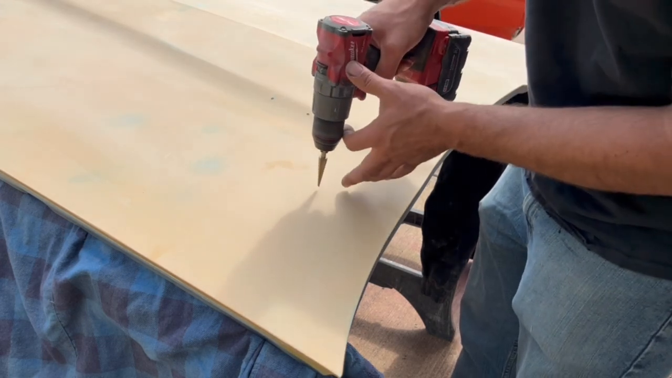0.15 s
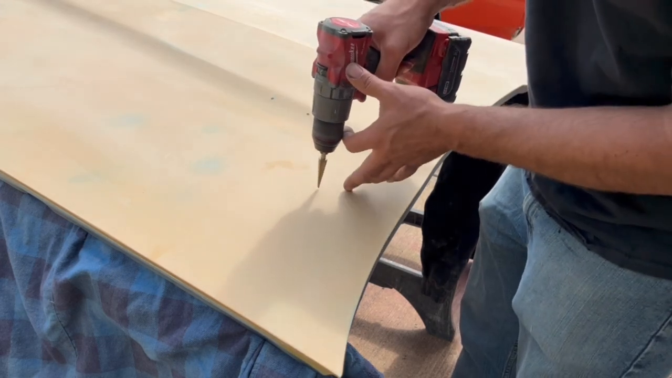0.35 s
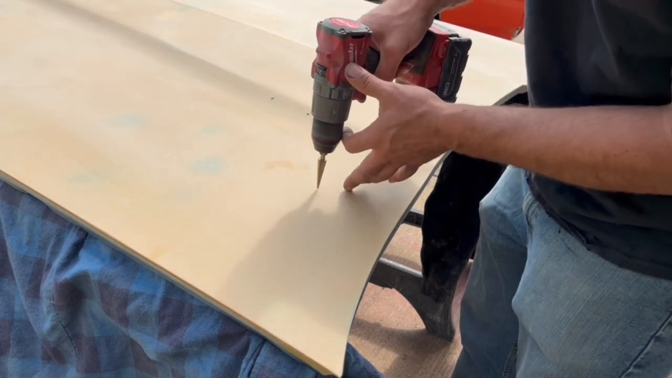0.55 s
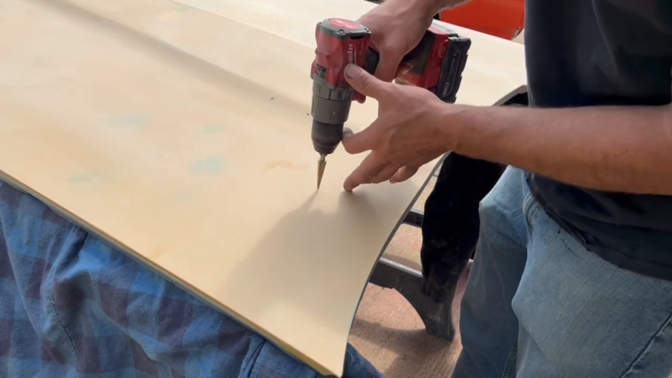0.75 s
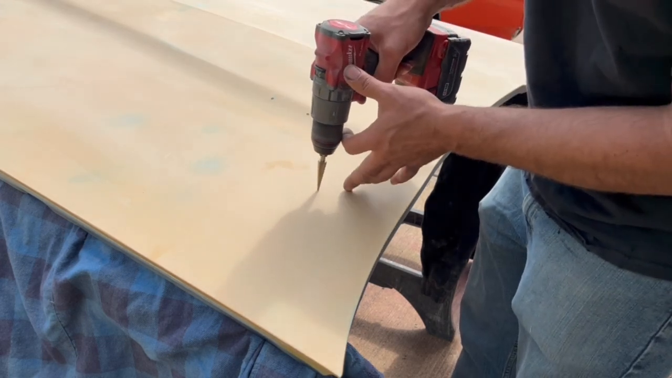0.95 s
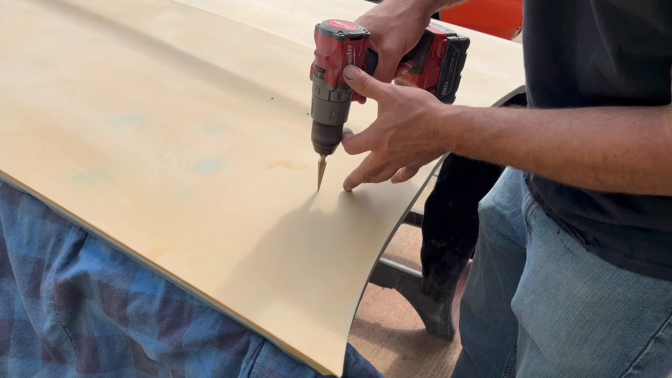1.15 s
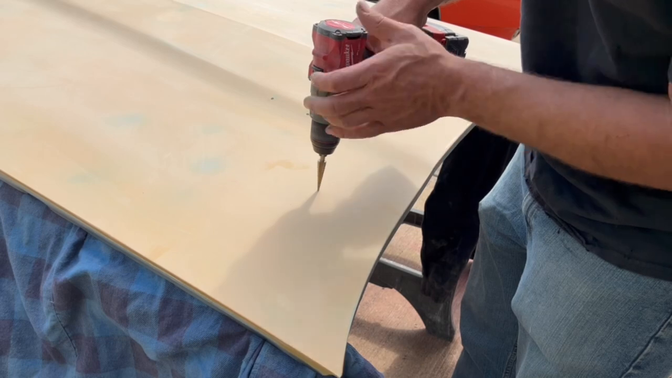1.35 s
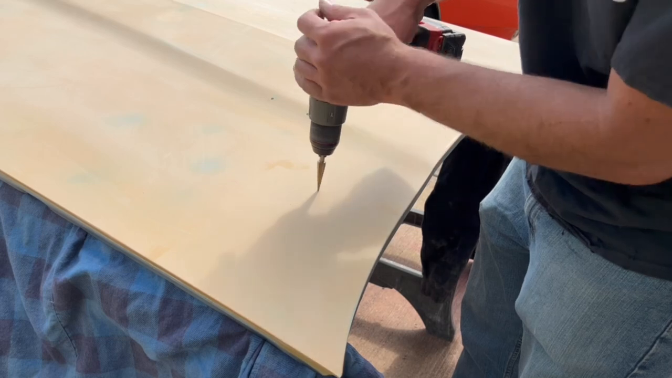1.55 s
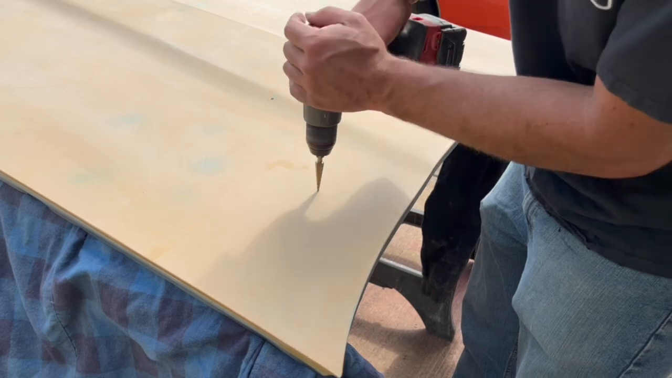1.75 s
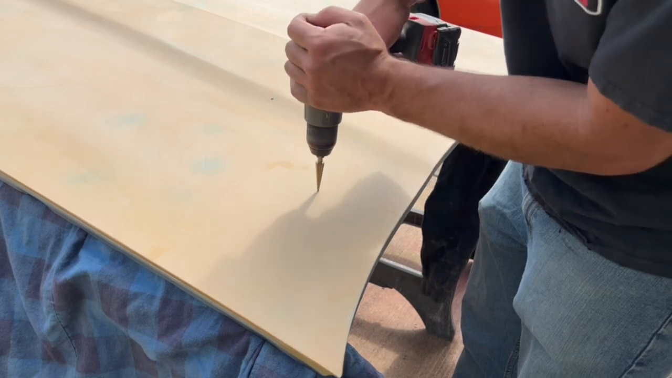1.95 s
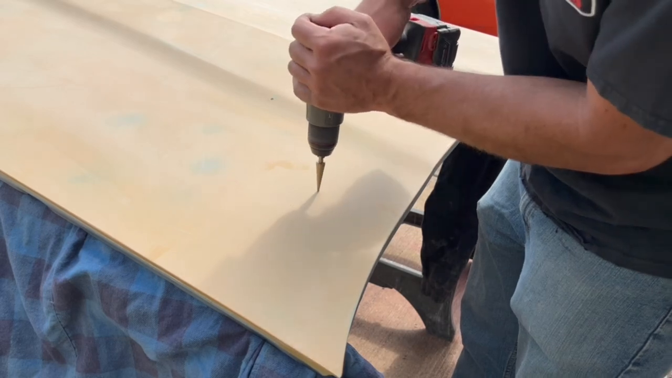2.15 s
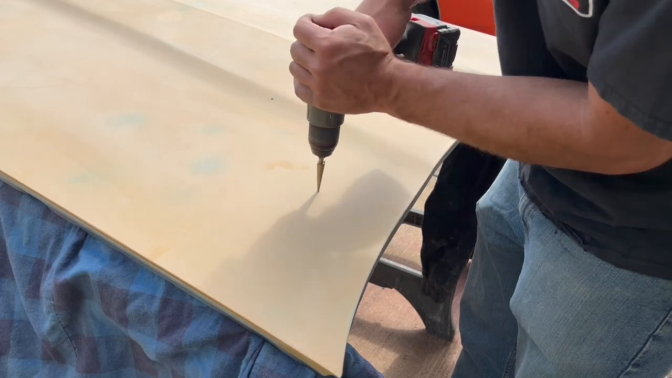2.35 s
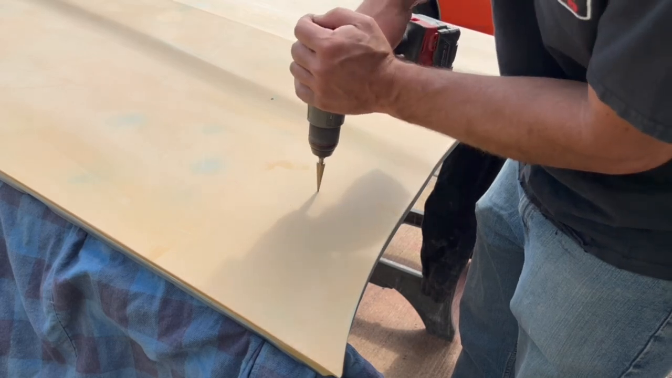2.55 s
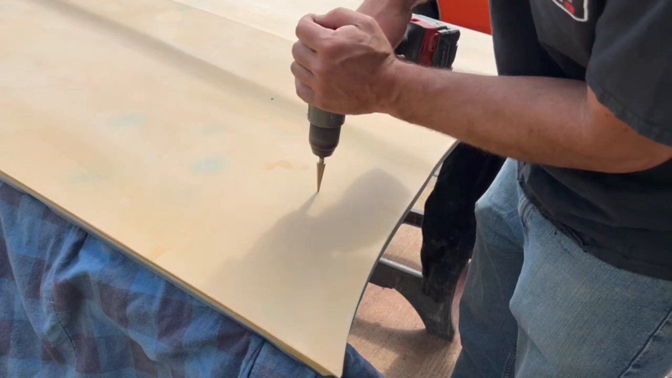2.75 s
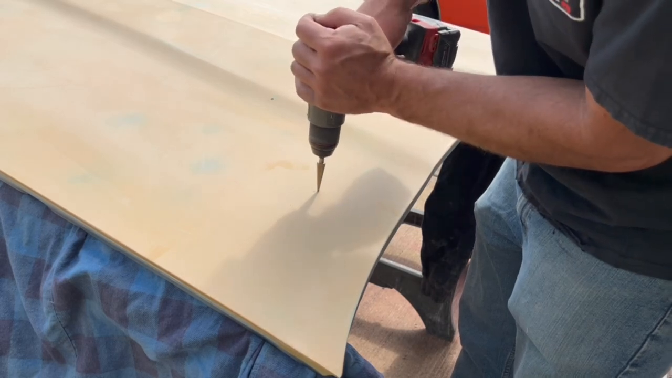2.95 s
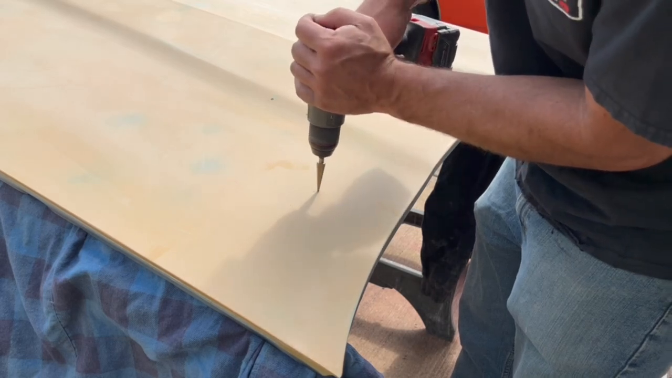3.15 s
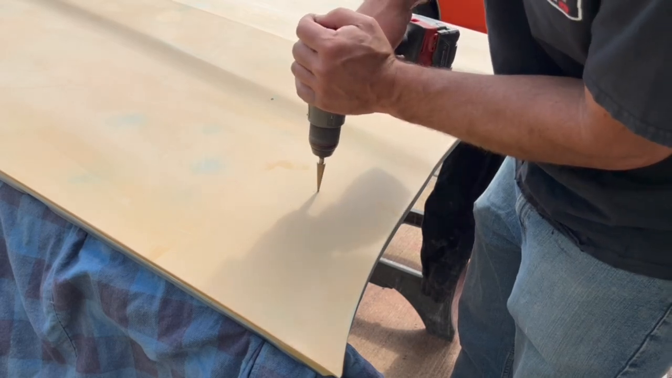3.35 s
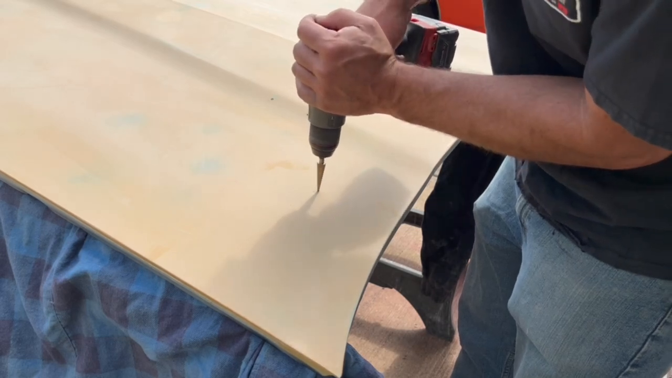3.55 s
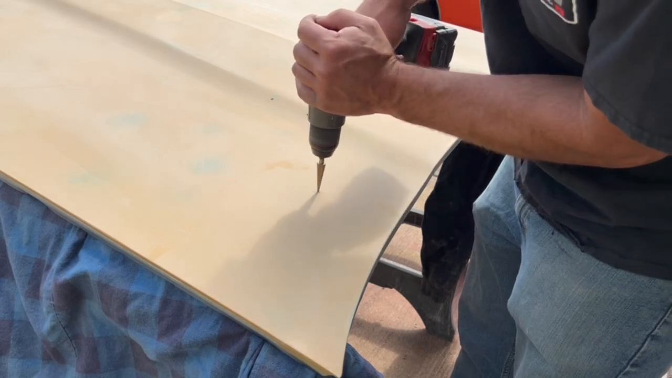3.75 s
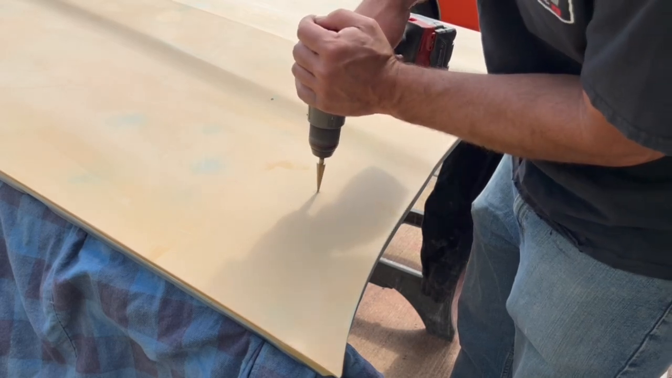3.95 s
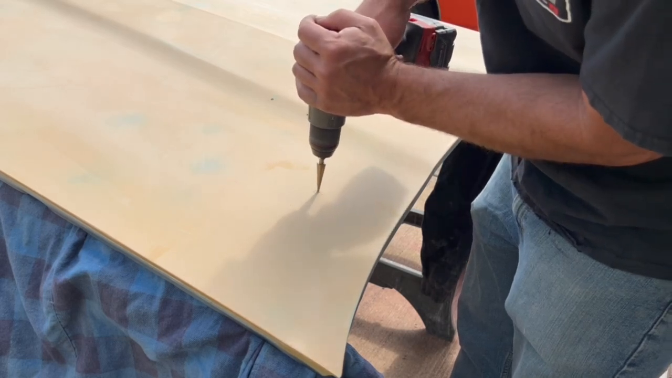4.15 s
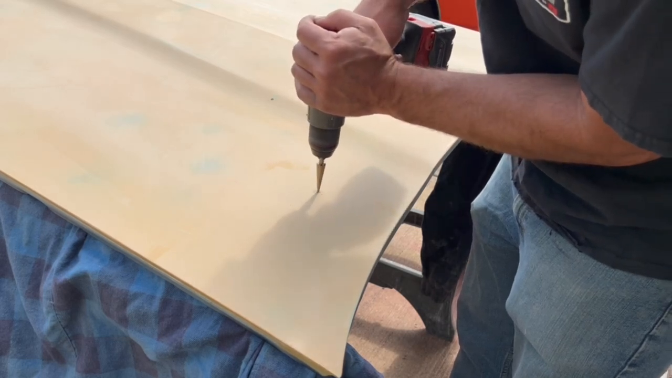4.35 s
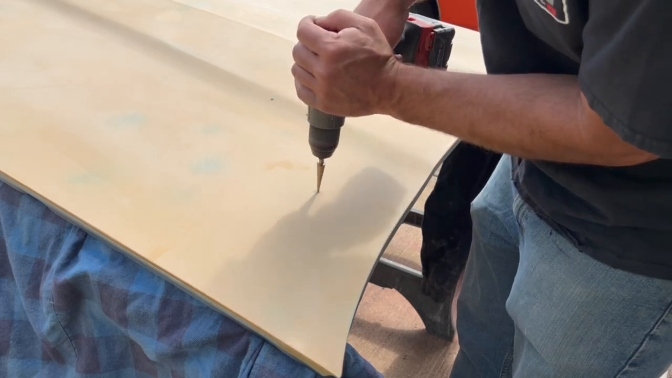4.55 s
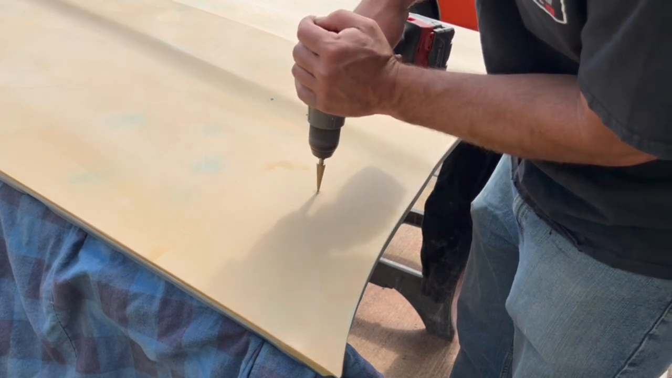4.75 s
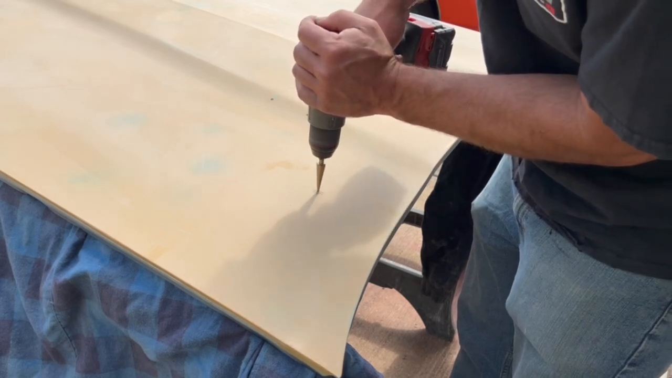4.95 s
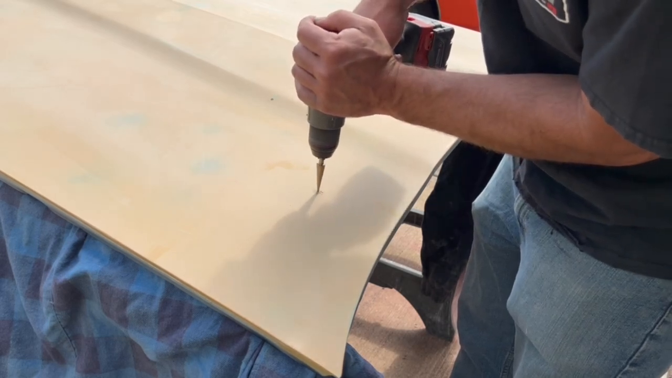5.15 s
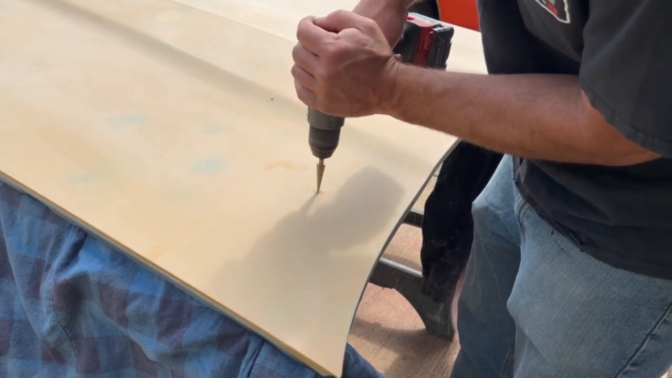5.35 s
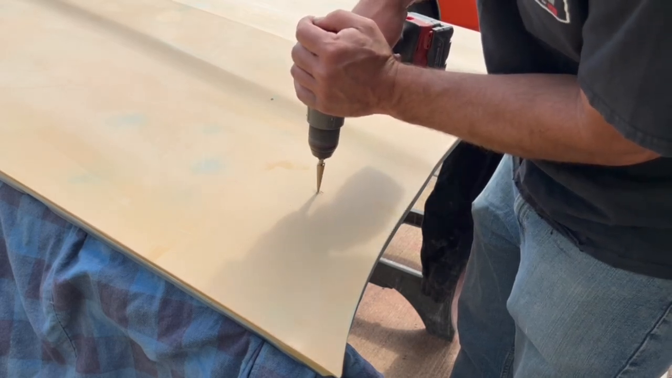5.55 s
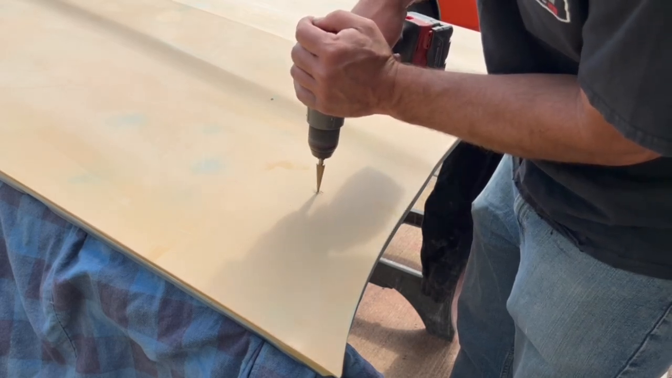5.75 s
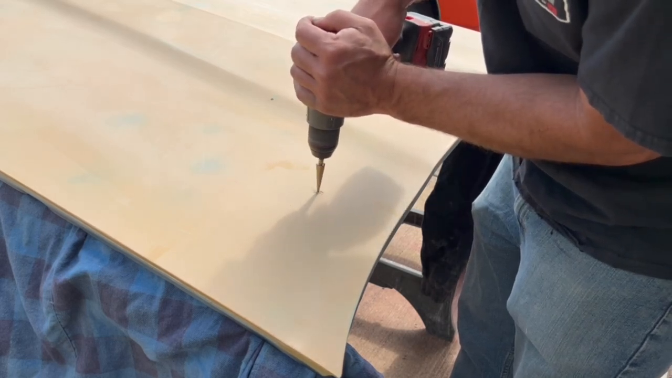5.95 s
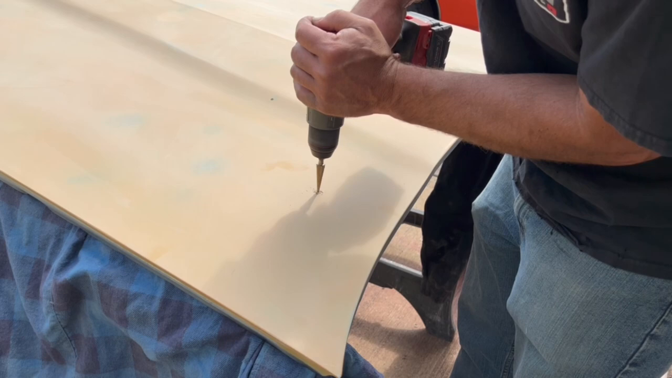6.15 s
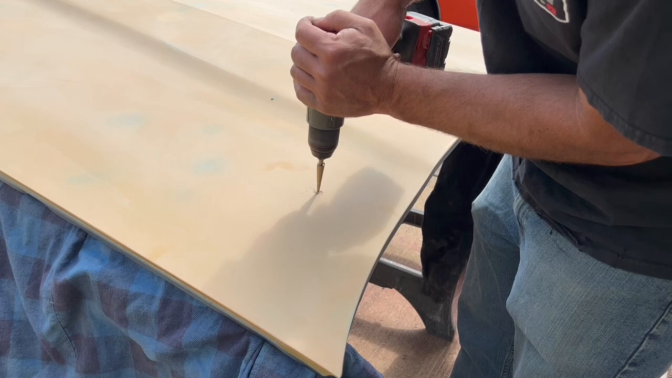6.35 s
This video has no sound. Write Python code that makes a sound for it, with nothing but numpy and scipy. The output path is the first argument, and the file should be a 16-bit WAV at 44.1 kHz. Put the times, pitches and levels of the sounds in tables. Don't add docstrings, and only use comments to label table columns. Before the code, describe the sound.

From 0 to 2 seconds the place is quiet: low town rumble, a faint distant machine hum stopping around 1.35, and sparrows in the yard. Soft chirps come at 0.1 and 0.55, thin peeps and far chatter near 0.7, louder sweeping chirps at 1.04 and 1.13, and another bright one at 1.68, with a light echo. Very faint hand and cloth rubs occur between 1 and 1.9. At 1.98 a switch clicks, followed by quickening small knocks. From 2.2 to 2.6 the cordless drill winds up through a harsh rattling sweep, reaching its full whine near 2.85. It stays loud and close, with a piercing whine, gear buzz, fluttering airy hiss and a drumming steel panel. From about 3.7 the load bites, the speed wavers, and pitch sags slightly through 6.4 while low thrumming grows. A brief peep near 4 is almost buried. The drill never stops.

```python
import sys
import numpy as np
from scipy import signal
from scipy.fft import rfft, irfft, next_fast_len
from scipy.io import wavfile
from scipy.ndimage import uniform_filter1d, map_coordinates

SR = 44100
rng = np.random.default_rng(int(sys.argv[2]) if len(sys.argv) > 2 else 0)


def undo_db(level):
    steps = np.asarray(level, float) / 20
    return 10 ** steps


def waveform_to_disk(signal):
    frames = np.transpose(np.atleast_2d(signal))
    scaled = np.clip(frames, -1, 1) * 32767
    samples = np.round(scaled).astype(np.int16)
    wavfile.write(sys.argv[1], SR, samples)


N = 282107

# frequency in Hz, density in dB per Hz.
TOWN_SPECTRUM = [(12, -52), (20, -29), (58, 2), (124, 4), (150, -7), (197, -8), (232, -11), (332, -15.5),
                 (494, -21.5), (768, -18.5), (2150, -35), (3000, -45), (3900, -81), (6600, -120)]
# time in seconds, pitch in Hz, level in dB.
HUM_TRACK = [
    (0, 197, -50.5),
    (.5, 198, -58.5),
    (.7, 202, -53.5),
    (1.3, 202, -52.5),
    (1.36, 203, -76),
]
# frequency in Hz, density in dB per Hz.
AIR_SPECTRUM = [(1500, -120), (2500, 1), (4000, 2), (6000, -21), (9000, -12), (12800, -32), (14000, -50)]
# start in seconds, stroke in seconds, level in dB.
SLEEVE_STROKES = [
    (.984, 0.033, -84),
    (1.088, .01, -76),
    (1.286, 0.033, -73),
    (1.462, 0.12, -76),
    (1.66, .03, -76),
    (1.75, .2, -84),
]
# frequency in Hz, density in dB per Hz.
SLEEVE_SPECTRUM = [(1200, -120), (1600, 11), (4000, -2), (8300, 1), (9700, -18), (11300, -1), (12500, -2),
                   (14600, -2), (15500, -30)]
# frequency in Hz, left-right likeness 0-1.
YARD_LIKENESS = [(100, 0.97), (250, 0.74), (700, 0.48), (1500, 0.092), (4000, 0.07)]
# start in seconds, length in seconds, start in Hz, top in Hz, level in dB.
CHIRP_NOTES = [
    (0.131, 0.05, 4580, 5220, -52.5),
    (0.541, 0.049, 4600, 5440, -46),
    (.668, 0.019, 4870, 5100, -53),
    (0.678, 0.026, 5060, 5800, -50),
    (1.04, 0.054, 3500, 5500, -38.5),
    (1.134, 0.0346, 5450, 5560, -40),
    (1.642, 0.053, 3390, 5400, -50),
    (1.68, .053, 4880, 5510, -38),
]
# start in seconds, length in seconds, pitch in Hz, glide in Hz, level in dB.
PEEP_NOTES = [(0.14, 0.027, 5900, -1600, -62), (0.22, .035, 3450, 900, -65), (0.24, .02, 4850, -53, -59),
              (0.24, 0.1, 4400, -45, -67), (.6, 0.02, 4600, -60, -59), (.695, 0.017, 4900, -100, -51),
              (0.72, 0.07, 4450, -50, -64), (0.75, 0.022, 4900, -100, -56), (0.912, .03, 3700, -50, -66),
              (0.48, .032, 3650, -450, -71), (0.77, 0.036, 3260, 700, -59), (.755, 0.013, 5300, -76, -56),
              (0.92, 0.03, 3300, -84, -58.5), (.948, .02, 3300, -62, -61), (.645, 0.033, 3400, 300, -68),
              (.71, .014, 3700, -300, -65), (.765, .014, 3100, 200, -62), (0.8, .015, 3300, -150, -68),
              (.315, .035, 3250, -30, -75), (1.026, 0.017, 3400, 200, -62), (1.114, 0.0087, 5000, 800, -52),
              (1.824, .012, 4800, -100, -55), (3.98, 0.02, 5500, -280, -36), (1.09, .026, 5800, -50, -54),
              (1.129, .03, 3200, -44, -60), (1.246, 0.034, 4900, -200, -56.5),
              (1.267, 0.068, 4800, -220, -60), (1.36, 0.1, 5100, -170, -67), (1.432, 0.091, 4690, -41, -62),
              (1.485, 0.08, 4760, 190, -64), (1.4, 0.075, 4920, 60, -67), (.112, .02, 3300, 1200, -71),
              (1.627, .045, 6100, -200, -59), (1.105, 0.019, 5100, 500, -51),
              (1.747, 0.013, 5000, -300, -56), (1.732, .018, 3120, 417, -65), (1.798, .015, 3360, 240, -68)]
# time in seconds, level in dB.
FLOCK_BURSTS = [
    (.16, -60),
    (.55, -62),
    (.7, -53.5),
    (1.06, -53),
    (1.18, -59),
    (1.55, -71),
    (1.68, -53),
    (1.8, -59.5),
]
# frequency in Hz, density in dB per Hz.
CHATTER_SPECTRUM = [(2600, -120), (3000, -13), (3500, -9.5), (4000, -8.5), (4600, 0.5), (5500, -2),
                    (6200, -14), (6700, -21), (8000, -43), (9000, -120)]
# time in seconds, peak in dB.
TRIGGER_CLICKS = [(1.984, -45), (2.003, -58), (2.014, -60), (2.027, -36.5), (2.049, -50), (2.0545, -43),
                  (2.068, -43), (2.08, -42), (2.089, -35), (2.098, -41), (2.105, -38), (2.114, -34),
                  (2.124, -30), (2.133, -31), (2.15, -28)]
# frequency in Hz, width in Hz, level in dB.
THRUM_MODES = [(80, 13, 0.5), (108.3, 8, 3.5), (160, 40, -12), (325.4, 18, -2.5), (439.5, 15, -7)]
# frequency in Hz, density in dB per Hz.
PANEL_SPECTRUM = [(24, -42), (40, -28), (92, -6), (200, -21), (283, -6), (368, -7), (506, -7.5),
                  (565, -3.5), (716, -9), (1040, -11), (1100, -12), (1430, -31), (2420, -120)]
# frequency in Hz, density in dB per Hz.
HISS_SPECTRUM = [(900, -120), (1000, -14.5), (1500, -10), (2700, -5.5), (3400, -5.5), (4200, -7.5),
                 (5000, -9.5), (5700, -3), (6600, 0), (7300, -12), (8500, -13.5), (10800, -17),
                 (12000, -17), (15000, -16.5)]
# frequency in Hz, gain in dB.
HOUSING_GAIN = [(450, 0), (620, -4), (720, -14), (880, -9), (1400, -34), (1800, -24), (2000, -8),
                (2200, -5), (2550, -5), (2850, 0), (3000, -5), (3120, -22), (3700, -17), (4500, -28),
                (6000, -32), (6800, -22), (7300, -50)]
# time in seconds, whine in Hz, level in dB.
WHINE_TRACK = [(2.035, 0, -90), (2.31, 1258, -59), (2.46, 1900, -31), (2.54, 2185, -25.5),
               (2.61, 2285, -25.5), (2.75, 2345, -24.5), (2.85, 2373, -21.5), (3.66, 2371.5, -23),
               (3.78, 2349, -26.5), (4.25, 2321, -27), (4.82, 2265, -26), (5.16, 2253, -25.5),
               (5.25, 2230, -27), (5.45, 2250, -26), (5.6, 2237, -26.5), (5.97, 2213.5, -28),
               (6.26, 2211, -27.5), (6.4, 2189.5, -30)]
# frequency in Hz, level in dB.
ORDER_1 = [(265, -52), (274, -39), (276.5, -41), (280, -34.5), (287.5, -39.5), (289.5, -48), (291.5, -40),
           (297, -41)]
ORDER_2 = [(500, -63), (550, -47), (558, -50.5), (565, -51.5), (575, -42), (582, -41.5), (594, -41.5)]
ORDER_4 = [(780, -46), (1000, -43.5), (1090, -43), (1105, -40.5), (1113, -47), (1124, -44), (1152, -46),
           (1162, -52), (1180, -46)]
ORDER_5 = [(1380, -54.5), (1420, -50.5), (1460, -50), (1483, -45.5)]
ORDER_10 = [(2600, -78), (2765, -40.5), (2790, -49), (2820, -38), (2850, -39), (2872, -36), (2905, -49),
            (2940, -41), (2965, -41.5)]
ORDER_13 = [(3300, -42), (3570, -44.5), (3650, -43), (3695, -46.5), (3735, -68), (3775, -43.5), (3820, -46),
            (3855, -35.5)]
ORDER_16 = [(4420, -58), (4500, -56), (4580, -50), (4660, -54), (4745, -58)]
# shaft multiple, level in dB.
STEADY_ORDERS = [(6, -52.5), (12, -45.5), (28, -61)]
# shaft multiple, dB over the 13th order.
FREE_ORDERS = [(3, -12.5), (25, -21), (40, -25), (41, -22), (43, -25), (44, -18), (46, -28), (47, -26),
               (50, -29)]
# time in seconds, phase in cycles.
THROB_PHASE = [(2.9, .25), (3.3, -.09), (3.7, -.3), (4.1, -.41), (4.9, .06), (5.3, .09), (5.7, -.09),
               (6.1, -.07)]
# shaft multiple, level in dB.
MESH_ORDERS = [(19.6, -44.5), (20.3, -43), (20.49, -44.5), (20.435, -47)]
# shaft multiple, free-running level in dB, level under the cut in dB.
PLANET_ORDERS = [(1.146, -53, -48), (9.217, -53, -60), (10.218, -50, -52), (10.606, -60, -52),
                 (12.226, -52, -53), (13.172, -62, -50), (14.363, -60, -52), (16.363, -54, -51),
                 (18.668, -53, -60), (19.435, -60, -53), (22.508, -60, -50), (29.723, -60, -53)]
# time in seconds, level in dB.
INRUSH_LEVEL = [(1.99, -85), (2.06, -53.5), (2.2, -37.5), (2.3, -29.5), (2.36, -28), (2.42, -29),
                (2.5, -37), (2.59, -28), (2.75, -68)]
# shaft multiple, level in dB.
INRUSH_ORDERS = [(10, -10), (12, -5), (16, 4), (20, 4), (28, 7), (32, 3)]
# frequency in Hz, level in dB.
VENT_FLARE = [(5500, -40), (5900, -9), (6300, -10), (6800, 3.5), (7150, -32)]
# chopper multiple, shaft multiple, level in dB.
CHOPPER_SIDES = [(1, -4, -40), (1, -20, -41), (1, 8, -57), (1, -8, -52)]
# frequency in Hz, level in dB.
UPPER_SIDE = [(8000, -43.5), (8900, -42), (9020, -56), (9110, -47), (9135, -45), (9160, -51), (9175, -49),
              (9190, -38)]
# frequency in Hz, level in dB.
CROSSING_SIDE = [(2200, -120), (2380, -46), (2520, -34), (2750, -29), (2950, -33), (3150, -55),
                 (3600, -120)]
# frequency in Hz, left lead in radians, left-right dB, likeness 0-1.
PORT_RESPONSE = [(98, 0.34, 2, 1), (317, 0.6, 4, 0.73), (460, 0.1, 2.5, 0.93), (1370, 1, -1.5, 0.76),
                 (2290, 0.59, -3.5, 0.7), (3100, 1.5, 3.5, 0.9), (3360, 1.5, -1, 0.26),
                 (4800, 1.5, 1.5, 0.28), (6060, 1, -2, 0.51), (6960, 1, 1, 0.5), (7770, 1.3, 6.5, 0),
                 (8160, -2, 4, 1), (8470, -3, -0.5, 0.83), (10420, -3, 3.5, 0.87), (11420, -5.5, -3, 0.8),
                 (11700, -6, 1, 1), (14100, -5.5, -0.5, 0.93), (14900, -9, 4, 0.8)]
# frequency in Hz, left lead in radians, left-right dB.
STANDING_WAVES = [(270, 0.5, -4), (279, -0.2, 1), (283.3, -1, -3), (282.6, 0.1, -4.5), (285.7, -1, 1),
                  (287.3, -0.8, -11), (289.3, 1, -11), (292.4, 1.3, 3.5), (295.7, 2, 5.5),
                  (296.6, 3.5, 9.5), (310, 1.5, -4), (560, 0, -0.5), (890, 0, 4), (1083, 1, 2),
                  (1112, 0, 8), (1100, 0, -1.5), (1127, 0, 2.5), (1164, -0.5, 6), (1190, -0.5, 4),
                  (1200, 0.5, 0), (1410, 0, -4), (1470, 0, -2.5), (2150, 0, 2.5), (2225, 0.27, -3),
                  (2230, 0, 2), (2272, 0.47, -2.5), (2272, 0.48, 8), (2306, 0.2, 5.5), (2326, 0.36, 5.5),
                  (2345, -0.34, -1), (2372, -.5, -0.5), (2460, 0.5, 4), (2788, -1, 0), (2793, 1.5, -1),
                  (2788, 1, 5), (2797, 0.5, 10), (2833, 0, 1), (2942, 1.5, -8), (2968, 1, 16),
                  (3037, 3, -4), (3400, -0.5, -4), (3530, 0.5, -3), (3630, 0.5, 8.5), (3760, 1.5, 6),
                  (3800, -0.5, 10), (3840, 0, 3), (4730, 0.5, 7), (5700, 0, -1), (6930, 0, 1), (7050, 2, 7),
                  (7000, 0, 1.5)]

TOWN_DB = -45.5
REST_HZ, LEAST_FALL = 4690, 0.84
UPSTROKE_HZ_PER_S, CREST_S = 150000, 0.0055
BEND, BEND_LOW = 0.533, 0.64
PEEP_ATTACK, PEEP_WAVER_HZ, CHIRP_WAVER_HZ = 0.27, 55, 15
FLOCK_RISE_DB_PER_S, FLOCK_FALL_DB_PER_S = 189, 91
SLEEVE_RISE_DB_PER_S, SLEEVE_FALL_DB_PER_S = 398, 400
THRUM_DB, THRUM_GAIN_DB_PER_S = -48, 3
HISS_DB, HISS_FULL_TURNS_PER_S, HISS_POWER, HISS_FADE_DB_PER_S = -29.37, 248, 1.46, 0.22
DRUM_DB, DRUM_FULL_TURNS_PER_S, DRUM_POWER, DRUM_GAIN_DB_PER_S = -39, 270, 0.74, 0.13
RATTLE_S, RATTLE_HOLD_S, RATTLE_DB = 2.193, 0.34, -35.5
CHOPPER_HZ, FULL_TURNS_PER_S = 8008, 280
CHUCK_RATIO, THROB = 18.4, 0.58
SHELL_HZ, SHELL_DB = 1500, -15
MESH_BLUR_CYCLES, MESH_FADE_DB = 0.05, 0.5


def seconds():
    return np.arange(N) / SR


def unit(x):
    return x / np.sqrt(np.mean(x ** 2) + 1e-20)


def along(points, hz, axis=1):
    p = np.transpose(points)
    return np.interp(np.log(hz + 1), np.log(p[0] + 1), p[axis])


def curves(rows):
    s, *cols = np.transpose(rows)
    return [np.interp(seconds(), s, c) for c in cols]


def after(start_s, rise_s):
    return np.clip((seconds() - start_s) / rise_s, 0, 1)


def swell_db(start_s, hold_s, db, rise, fall):
    t = seconds()
    return db - rise * np.maximum(start_s - t, 0) - fall * np.maximum(t - start_s - hold_s, 0)


def wobble(rate_hz):
    knots = rng.standard_normal(int(N * rate_hz / SR) + 4)
    return map_coordinates(knots, [np.arange(N) * rate_hz / SR])


def split_db(half_db):
    return undo_db([[half_db], [-half_db]])


def filtered(x, response):
    m = next_fast_len(N + SR // 2)
    return irfft(rfft(x, m) * response(np.fft.rfftfreq(m, 1 / SR)), m)[..., :N]


def noise(spectrum, patchy_db):
    z = signal.stft(rng.standard_normal((2, N)), nperseg=512)[2]
    field = uniform_filter1d(rng.standard_normal(z.shape[1:]), 6, 0)
    field = uniform_filter1d(field, 12, 1)
    pair = signal.istft(z * undo_db(patchy_db * unit(field)), nperseg=512)[1][:, :N]
    return unit(filtered(pair, lambda hz: undo_db(along(spectrum, hz))))


def tone(cycles, db, flutter_db):
    gain = np.sqrt(2) * undo_db(db + flutter_db * wobble(30))
    return gain * np.sin(2 * np.pi * (cycles + rng.random()))


def diffuse(pair, lead_s):
    def mid_side(hz):
        angle = np.arccos(np.clip(along(YARD_LIKENESS, hz), -1, 1)) / 2
        return np.array([np.cos(angle), np.sin(angle)])

    mid, side = filtered(pair, mid_side)
    return np.array([mid + side, np.roll(mid - side, round(lead_s * SR))])


def at_ports(tones, hiss, scattered):
    half = np.array([[.5], [-.5]])

    def tilt(points, hz):
        return undo_db(half * along(points, hz, axis=2)) * np.exp(1j * half * along(points, hz))

    def port(hz):
        return tilt(PORT_RESPONSE, hz)

    def alike(hz):
        return np.clip(along(PORT_RESPONSE, hz, axis=3), 0, 1)

    near = filtered(tones, lambda hz: port(hz) * tilt(STANDING_WAVES, hz))
    near = near + filtered(hiss, lambda hz: port(hz) * np.sqrt(alike(hz)))
    return near + filtered(scattered, lambda hz: abs(port(hz)) * np.sqrt(1 - alike(hz)))


def yard():
    hum_hz, hum_db = curves(HUM_TRACK)
    hum = tone(np.cumsum(hum_hz) / SR, hum_db, flutter_db=-4.0)
    town_gain = undo_db(TOWN_DB - 2.0 * after(1.6, 0.4) + 1.7 * wobble(6.92))
    town = town_gain * diffuse(noise(TOWN_SPECTRUM, patchy_db=1.0), lead_s=0.00041)
    strokes = sum(undo_db(swell_db(*row, SLEEVE_RISE_DB_PER_S, SLEEVE_FALL_DB_PER_S)) for row in SLEEVE_STROKES)
    sleeve = strokes * undo_db(9.5 + 2.5 * wobble(150)) * noise(SLEEVE_SPECTRUM, patchy_db=3)
    air = undo_db(-74.5) * noise(AIR_SPECTRUM, patchy_db=5.5)
    thud = noise([(200, -40), (300, 0), (450, -3), (650, -40)], patchy_db=0.5)[0]
    lean = undo_db(swell_db(1.57, .06, -61, rise=300, fall=200)) * thud
    return (town + sleeve + air + lean) * split_db(.6) + hum * split_db(1.2)


def bird_note(length_s, start_hz, top_hz, end_hz, crest_s, waver_hz, is_chirp):
    u = np.arange(int(length_s * SR)) / SR
    up_s = (top_hz - start_hz) / UPSTROKE_HZ_PER_S
    knots = [0, up_s, up_s + crest_s, (up_s + crest_s + length_s) / 2, length_s]
    bend = BEND_LOW if start_hz < 3600 else BEND
    bend_hz = end_hz + bend * (top_hz - end_hz)
    hz = np.interp(u, knots, [start_hz, .97 * top_hz, top_hz, bend_hz, end_hz]) + waver_hz
    onset = .3 if start_hz > 4500 and is_chirp else .04
    swell = np.clip(u / .002, 0, 1) * np.interp(u, knots, [onset, .65, 1, .85, 0])
    if is_chirp:
        swell = swell * np.clip((hz - 3600) / 1300, .2, 1) ** 1.5
    return swell * np.sin(2 * np.pi * np.cumsum(hz) / SR)


def sparrows():
    notes = [(s, n, start, top, min(REST_HZ, LEAST_FALL * top), db, CREST_S, CHIRP_WAVER_HZ, True)
             for s, n, start, top, db in CHIRP_NOTES]
    notes += [(s, n, 0.97 * hz, hz, hz + glide, db, PEEP_ATTACK * n, PEEP_WAVER_HZ, False)
              for s, n, hz, glide, db in PEEP_NOTES]
    out, waver = np.zeros(N), wobble(300)
    for s, length_s, start_hz, top_hz, end_hz, db, crest_s, waver_hz, is_chirp in notes:
        i = round(s * SR)
        drift_hz = waver_hz * waver[i:i + int(length_s * SR)]
        note = bird_note(length_s, start_hz, top_hz, end_hz, crest_s, drift_hz, is_chirp)
        out[i:i + len(note)] += 1.26 * undo_db(db) * note
    out *= undo_db(2.3 * wobble(250))
    t = np.arange(SR * 2 // 3) / SR
    tail = rng.standard_normal((2, len(t))) * undo_db(-60 * t / 0.33) * (t > .008)
    echo = signal.fftconvolve(out[None], tail / np.linalg.norm(tail[0]), axes=1)[:, :N]
    bursts = sum(undo_db(swell_db(s, 0, db, FLOCK_RISE_DB_PER_S, FLOCK_FALL_DB_PER_S)) for s, db in FLOCK_BURSTS)
    flock = bursts * undo_db(1.3 * wobble(59.96)) * noise(CHATTER_SPECTRUM, patchy_db=4.5)
    return (out + flock) * split_db(3) + undo_db(-7) * echo


def trigger():
    out, t = np.zeros(N), np.arange(SR // 40) / SR
    modes = [(2740, 0.66), (2640, 0.48), (2340, 0.41), (2040, 0.22)]  # Hz, gain
    ring = sum(gain * np.sin(2 * np.pi * hz * t) for hz, gain in modes)
    ring = ring * undo_db(-60 * t / 0.014) * (1 - np.exp(-t / 0.00058))
    for s, db in TRIGGER_CLICKS:
        snap = 0.16 * undo_db(-60 * t / 0.0097) * rng.standard_normal(len(t))
        out[round(s * SR):][:len(t)] += undo_db(db + 5.0) * (ring + snap)
    return out


def thrum():
    def modes(f):
        resonances = sum(undo_db(db) * 1j * f * w / (c * c - f * f + 1j * f * w) for c, w, db in THRUM_MODES)
        return f ** 2 / (f ** 2 + 55 ** 2) * resonances

    level_db = THRUM_DB + THRUM_GAIN_DB_PER_S * (seconds() - 2.5) + 0.6 * wobble(5)
    shaking = unit(filtered(rng.standard_normal(N), modes))
    return after(2.4, 0.11) * undo_db(level_db) * shaking * split_db(.8)


def works(speed, turns):
    running_s = np.maximum(seconds() - 2.5, 0)
    hiss_gain = undo_db(HISS_DB - HISS_FADE_DB_PER_S * running_s + 0.41 * wobble(8))
    hiss_gain = hiss_gain * np.clip(speed / HISS_FULL_TURNS_PER_S, 0, 1) ** HISS_POWER
    hiss_gain = hiss_gain * undo_db(np.sin(2 * np.pi * turns) + 0.33 * wobble(400) + 0.46 * wobble(40))
    drum_gain = undo_db(DRUM_DB + DRUM_GAIN_DB_PER_S * running_s + 1.17 * wobble(12))
    drum_gain = drum_gain * np.clip(speed / DRUM_FULL_TURNS_PER_S, 0, 1) ** DRUM_POWER
    rattle_db = swell_db(RATTLE_S, RATTLE_HOLD_S, RATTLE_DB, rise=126, fall=100)
    rattle_gain = undo_db(3.3 * np.cos(2 * np.pi * 4 * turns) + 1.3 * wobble(180) + rattle_db)
    rattle_spectrum = [(1000, -120)] + list(HOUSING_GAIN[4:13]) + [(5000, -120)]

    def draw():
        hiss = hiss_gain * noise(HISS_SPECTRUM, patchy_db=1.62)
        drum = drum_gain * noise(PANEL_SPECTRUM, patchy_db=-0.5)
        rattle = rattle_gain * noise(rattle_spectrum, patchy_db=1.5)
        return after(2.025, 0.063) * (hiss + drum + rattle)

    return draw()[0], draw()


def shaft():
    speed = uniform_filter1d(curves(WHINE_TRACK)[0] / 8, SR // 50)
    tug = 0.092 + 0.16 * after(3.645, 0.11)
    speed = speed + tug * wobble(30) * after(2.58, 0.21)
    return speed, np.cumsum(speed) / SR


def whistle(turns):
    level_db = swell_db(2.12, 0.28, -49.0, rise=320, fall=450)
    cycles = CHOPPER_HZ * seconds() + 4 * turns
    return after(2.03, .03) * tone(cycles, level_db, flutter_db=1.2) * undo_db([[3], [-6]])


def rotor(speed, turns, full):
    bodies = {2: ORDER_2, 4: ORDER_4, 5: ORDER_5, 10: ORDER_10, 13: ORDER_13, 16: ORDER_16}
    load_db = {k: along(body, k * speed) for k, body in bodies.items()}
    chuck = (turns - turns[3 * SR]) / CHUCK_RATIO + curves(THROB_PHASE)[0]
    throb_db = 20 * np.log10(abs(1 + THROB * np.exp(2j * np.pi * chuck)))
    load_db[4] = load_db[4] + 5 * (1 - after(2.68, .06)) + throb_db
    load_db[10] = load_db[10] + 4 * (1 - after(2.75, .1)) * (wobble(70) - 1)
    whine_db = curves(WHINE_TRACK)[1] + along([(1500, 1), (1700, 0)], 8 * speed)
    out = after(2.3, 0.059) * tone(8 * turns, whine_db, flutter_db=-0.05)
    out += after(2.49, 0.092) * tone(turns, along(ORDER_1, speed), flutter_db=0.0)
    loaded = sum(tone(k * turns, db, flutter_db=0.97) for k, db in load_db.items())
    out += full ** .5 * after(2.29, 0.097) * loaded
    out += full ** 5 * sum(tone(k * turns, db, flutter_db=1.5) for k, db in STEADY_ORDERS)
    free = sum(tone(k * turns, load_db[13] + db, flutter_db=1.0) for k, db in FREE_ORDERS)
    return out + full ** 8 * free


def gears(turns, full):
    mesh_db = -MESH_FADE_DB * after(4, 0.34)
    mesh = sum(tone(k * turns + MESH_BLUR_CYCLES * wobble(40), db + mesh_db, flutter_db=3.0)
               for k, db in MESH_ORDERS)
    cutting = after(3.7, 1.2)
    planets = sum(tone(k * turns, free_db + (cut_db - free_db) * cutting, flutter_db=1.0)
                  for k, free_db, cut_db in PLANET_ORDERS)
    return full ** 5 * (mesh + planets)


def inrush(speed, turns):
    current_db = curves(INRUSH_LEVEL)[0]
    out = after(2.27, .03) * tone(5 * turns, current_db - 8 + along(HOUSING_GAIN, 5 * speed), flutter_db=3.0)
    out += tone(30 * turns, current_db + along(VENT_FLARE, 30 * speed), flutter_db=1.5)
    for k, db in INRUSH_ORDERS:
        hz = k * speed
        shell_db = (k > 13) * SHELL_DB * np.clip(3 - 3 * hz / SHELL_HZ, 0, 1)
        shell_db = shell_db - (k > 17) * 9 * np.clip(hz / 200 - 15, 0, 1)
        level_db = current_db + db + along(HOUSING_GAIN, hz) + shell_db + 1.5 * wobble(120)
        out += tone(k * turns, level_db, flutter_db=1.2)
    return out


def chopper(speed, turns, full):
    def chopped(k, db, flutter_db=1.5):
        return tone(CHOPPER_HZ * seconds() + k * turns, db, flutter_db)

    crossing_db = along(CROSSING_SIDE, CHOPPER_HZ - 20 * speed)
    out = (seconds() < 3) * chopped(-20, crossing_db, flutter_db=.7)
    upper_db = along(UPPER_SIDE, CHOPPER_HZ + 4 * speed) - 8 * (1 - full)
    upper_db = upper_db - 6 * (after(2.9, .04) - after(2.9, .05))
    upper_db = upper_db - 9 * (after(2.45, .1) - after(3.7, 0.34))
    out += after(1.992, 0.0043) * (0.26 + 0.96 * after(2.006, .09)) * chopped(4, upper_db)
    for (_, k, db), power in zip(CHOPPER_SIDES, (1, 9, .7, 1)):
        growth = (full + 0.0031) ** power
        out += after(1.985, 0.082) * growth * chopped(k, db - 1.2 * after(2.9, 0.64))
    return out


def motor(speed, turns):
    full = np.clip(speed / FULL_TURNS_PER_S, 0, 1)
    return rotor(speed, turns, full) + gears(turns, full) + inrush(speed, turns) + chopper(speed, turns, full)


def scene():
    speed, turns = shaft()
    direct, scattered = works(speed, turns)
    drill = after(1.976, .005) * at_ports(motor(speed, turns), direct + trigger(), scattered)
    return yard() + sparrows() + thrum() + whistle(turns) + drill


def roll_off(x):
    return signal.sosfilt(signal.butter(12, 15800, fs=SR, output="sos"), x)


def record(dry):
    return roll_off(dry)


dry = scene()
out = record(dry)
waveform_to_disk(out)
```